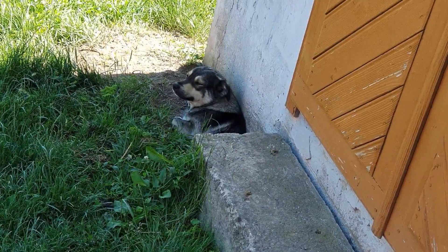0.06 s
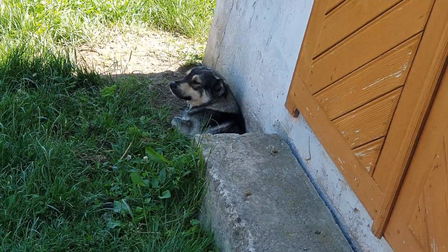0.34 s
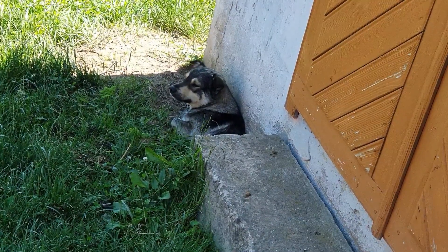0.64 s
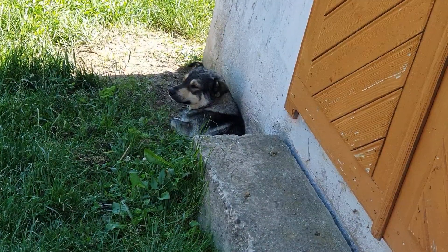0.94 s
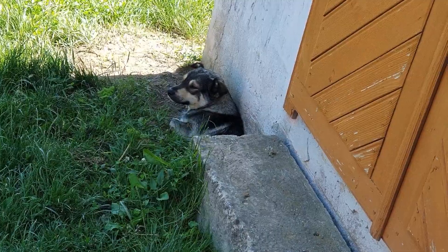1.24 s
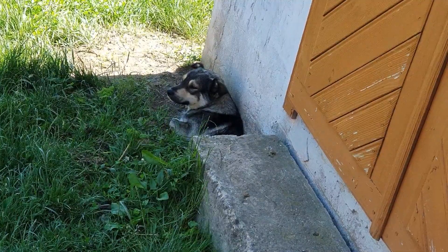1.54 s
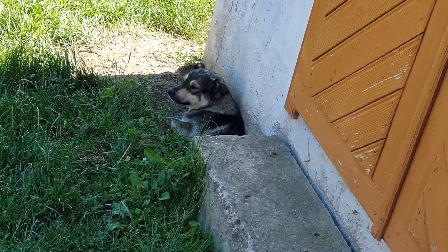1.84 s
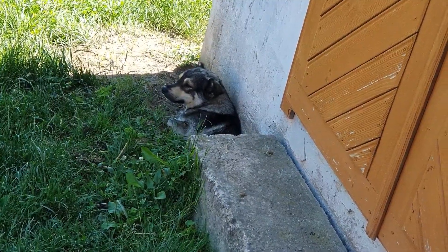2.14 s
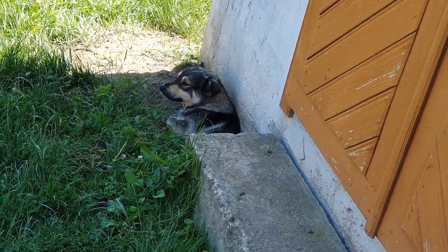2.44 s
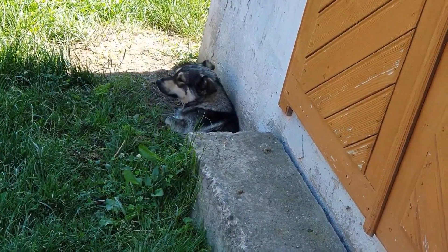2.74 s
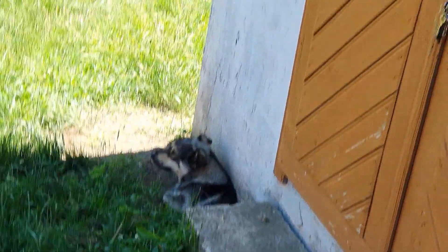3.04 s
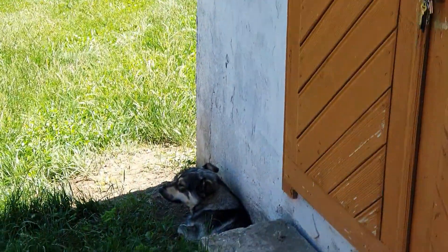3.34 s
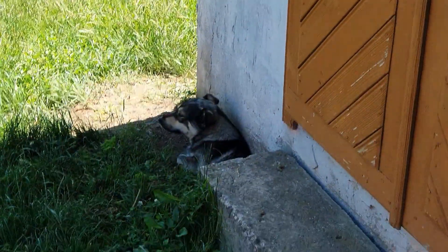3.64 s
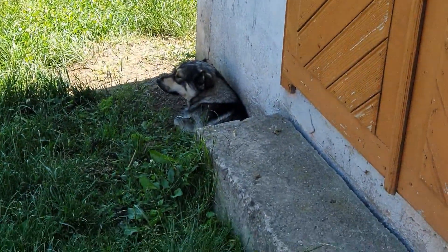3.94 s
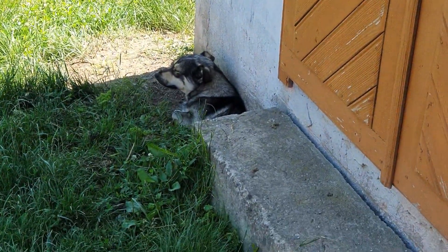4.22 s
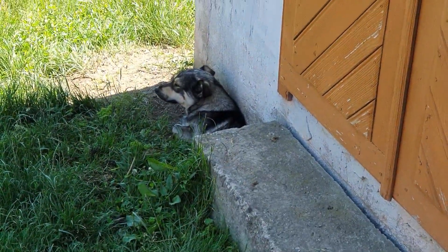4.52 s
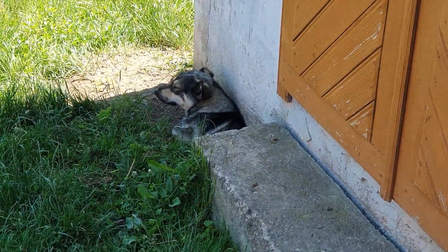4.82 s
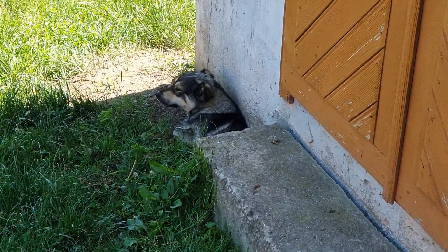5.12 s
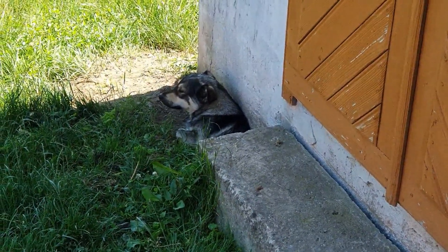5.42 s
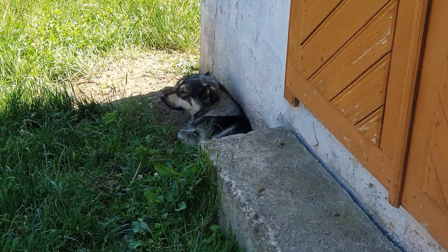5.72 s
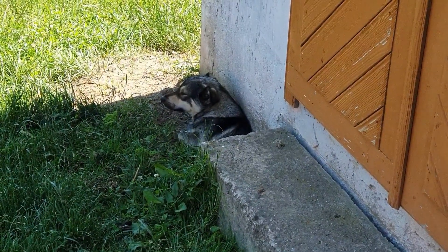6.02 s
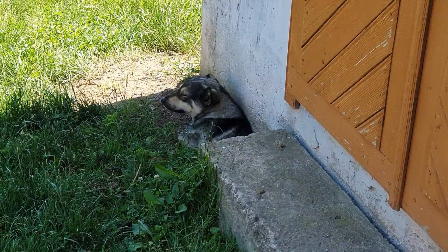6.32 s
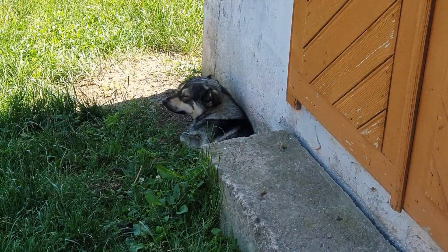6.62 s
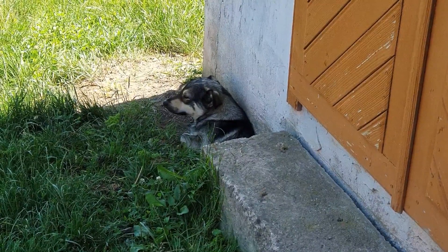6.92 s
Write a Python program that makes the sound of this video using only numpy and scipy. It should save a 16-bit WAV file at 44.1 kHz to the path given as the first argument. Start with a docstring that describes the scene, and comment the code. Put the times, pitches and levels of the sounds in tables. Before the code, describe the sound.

From the start, nearby sparrows give short, buzzy chirps in a summer farmyard, over the chatter of a distant flock and a faint outdoor hiss. Light gusts buffet the microphone with low rumbles and sudden puffs that shift between left and right. At about 1.3 seconds a songbird begins fluty, gliding whistles that ring slightly among the trees. Near 2 seconds, as the wind drops, a far rooster crows once, very faintly. From 2 to 4.6 seconds a soft, fluttering rustle sounds close by, with a few dull bumps from 3 seconds on. The songbird sings a short phrase at 3 seconds and again at 4.8, when a sparrow also begs in thin, high squeals. The wind returns around 3.4 seconds and puffs most often between 4.5 and 6.4. Chirps and whistles continue until the end, just after 7 seconds.

```python
"""A summer farmyard, beside a house wall. From the start, sparrows chirp over a far flock and still air,
each call a gliding, trilled syrinx tone, while light gusts buffet the two microphone ports.
At 1.3 s a songbird starts fluty whistles in the trees; near 2 s a far rooster crows faintly.
From 2 to 4.6 s a soft, fluttering rustle and a few dull bumps sound close by. The songbird sings its
motif at 3 s and at 4.8 s, as a sparrow begs in thin squeals. Chirps, whistles and wind carry on."""
import sys
import numpy as np
from scipy import signal
from scipy.fft import rfft, irfft, next_fast_len
from scipy.io import wavfile
from scipy.ndimage import uniform_filter1d

SR = 44100
rng = np.random.default_rng(int(sys.argv[2]) if len(sys.argv) > 2 else 0)


def wrap_up_sound(samples):
    """Save the sound to the file named by the first command line argument, as 16-bit audio."""
    columns = np.atleast_2d(samples).T
    # keep every value between -1 and 1, then stretch to whole-number steps
    tamed = np.clip(columns, -1, 1)
    steps = np.round(tamed * 32767).astype(np.int16)
    wavfile.write(sys.argv[1], SR, steps)


N = 316197
TIME = np.arange(N) / SR


def from_db(db):
    """Decibels to gain. Table levels are relative, ahead of each source's gains and filters."""
    return 10 ** (np.asarray(db) / 20)


def unit_rms(x):
    """Scale to unit power."""
    return x / np.sqrt(np.mean(x ** 2) + 1e-20)


def curves(rows):
    """Interpolate each column of a time table to every sample."""
    times, *columns = np.transpose(rows)
    return [np.interp(TIME, times, column) for column in columns]


def panned(pan_db):
    """Constant-power stereo gains; pan is left minus right."""
    gains = from_db(np.array([[.5], [-.5]]) * pan_db)
    return gains / np.sqrt(np.mean(gains ** 2, axis=0))


def add(out, start_s, sound):
    """Mix in a stereo sound."""
    at = int(np.clip(start_s * SR, 0, N - 1))
    out[:, at:at + sound.shape[1]] += sound[:, :N - at]


def coloured(x, spectrum):
    """Filter by (f/Hz, level/dB) points; cut everything outside them."""
    hz, db = np.transpose(spectrum)
    length = x.shape[1]
    size = next_fast_len(length, True)
    bins_hz = np.maximum(np.fft.rfftfreq(size, 1 / SR), 1)
    gain = from_db(np.interp(np.log(bins_hz), np.log(hz), db, left=-120, right=-120))
    return irfft(rfft(x, size) * gain, size)[:, :length]


def noise(spectrum):
    """Shaped unit noise, independent at the two ports."""
    return unit_rms(coloured(rng.standard_normal((2, N)), spectrum))


def drift(corner_hz):
    """Smooth random curve of unit RMS."""
    step, run_in = 8, 4000
    pole = np.exp(-2 * np.pi * corner_hz * step / SR)
    white = rng.standard_normal(N // step + run_in + 2)
    slow = signal.lfilter([1], [1, -2 * pole, pole * pole], white)[run_in:]
    return np.interp(np.arange(N) / step, np.arange(len(slow)), unit_rms(slow))


def thumps(rows, width, rise_s):
    """Soft swells of band noise around each row's frequency."""
    out, t = np.zeros((2, N)), np.arange(SR // 6) / SR
    swell = (t / rise_s) ** 3 * np.exp(-3 * t / rise_s)
    for at_s, peak_db, hz, pan_db in rows:
        band = signal.butter(2, [hz / (1 + width), hz * (1 + width)], "band", fs=SR, output="sos")
        white = rng.standard_normal((2, 2 * len(t)))
        thump = swell * signal.sosfilt(np.vstack([band, band]), white)[:, len(t):]
        thump /= np.abs(thump).max(axis=1, keepdims=True)
        add(out, at_s - rise_s / 2, from_db(peak_db) * thump * panned(pan_db))
    return out


def syrinx(notes, trill_hz, trill_swing, tremolo, jitter, overtone_db, edge_db, second_db, second_spread,
           fade_s=.012, flicker_db=2.5):
    """Gliding near-sines; rasp trills and shakes them and brings in the syrinx's second side."""
    out = np.zeros((2, N))
    shake, waver, flicker = drift(260), drift(50), drift(55)
    for note, weave_offset in zip(notes, rng.random(len(notes))):
        start_s, length_s, first_hz, mid_hz, last_hz, rasp, db, pan_db = note
        length_s, rasp = max(length_s, .01), np.clip(rasp, 0, 1)
        samples = np.arange(int((length_s + fade_s) * SR))
        t, span = samples / SR, (samples + int(start_s * SR)) % N
        progress = np.clip((t - fade_s / 2) / length_s, -.08, 1.08)
        parabola = np.polyfit([0, .5, 1], [first_hz, mid_hz, last_hz], 2)
        glide_hz = np.polyval(parabola, progress) * (1 + .007 * waver[span])
        trill = np.sin(2 * np.pi * trill_hz * t)
        bend = 1 + rasp * (trill_swing * trill + jitter * shake[span])
        phase = 2 * np.pi * np.cumsum(glide_hz * bend) / SR
        # second side weaves above and below the first
        weave = 1 + second_spread * np.sin(2 * np.pi * (weave_offset + progress)) - jitter * shake[span]
        second_phase = 2 * np.pi * np.cumsum(np.sqrt(glide_hz * mid_hz) * weave) / SR
        tone = np.sin(phase) + rasp * from_db(second_db) * np.sin(second_phase)
        smear = 4 * rasp * shake[span]  # turns overtones to bright hiss
        overtones = np.sin(2 * phase + smear)
        overtones += rasp * (np.sin(phase + second_phase - smear) + np.sin(3 * phase - smear))
        envelope = np.sin(np.pi / 2 * np.clip(np.minimum(t, t[-1] - t) / fade_s, 0, 1)) ** 2
        envelope *= from_db(edge_db * (2 * progress - 1) ** 2 + flicker_db * flicker[span])
        envelope *= 1 + np.clip(tremolo * rasp, 0, 1) * trill
        voice = unit_rms((tone + from_db(overtone_db) * overtones) * envelope)
        add(out, start_s - fade_s / 2, from_db(db) * voice * panned(pan_db))
    return out


def slides(rows, arch):
    """Slides to syrinx notes: rises go straight, falls bow by `arch` octaves per octave."""
    notes = []
    for start_s, length_s, hz, slide_oct, rasp, db, pan_db in rows:
        sag_oct = arch * min(slide_oct, 0)
        first_hz, last_hz = hz * 2 ** (sag_oct - slide_oct / 2), hz * 2 ** (sag_oct + slide_oct / 2)
        notes.append((start_s, length_s, first_hz, hz, last_hz, rasp, db, pan_db))
    return notes


# Echo tail; overtones beamed away by the beak arrive scattered: f/Hz, level/dB
TAIL_SPECTRUM = [(300, -5.5), (6000, 1), (8000, 7), (11500, 3), (16000, 24)]
def yard(x, wall_db, tail_db, t60_s, port_lag_s=.00044):
    """Direct sound, left port first; quick wall and ground reflections; a diffuse tail."""
    t = np.arange(SR) / SR
    envelope = from_db(-60 * t / t60_s) * (1 - np.exp(-t / .006))
    tail = unit_rms(rng.standard_normal((2, SR)) * envelope) / np.sqrt(SR)
    response = from_db(tail_db) * coloured(tail, TAIL_SPECTRUM)
    response[[0, 1], [0, round(port_lag_s * SR)]] += 1
    for side in response:
        lags = (rng.uniform(.00091, .018, size=6) * SR).astype(int)
        side[lags] += from_db(wall_db) * rng.choice([-1, 1], size=6)
    return signal.fftconvolve(x, response, axes=1)[:, :N]


# Outdoor noise floor: f/Hz, level/dB
AIR_SPECTRUM = [(25, -13), (55, -1), (120, -4), (250, -10.5), (500, -15.5), (800, -15), (1100, -21.5),
                (2000, -24.5), (5000, -14.5), (7500, -33), (10000, -32.5), (15500, -40)]
def still_air():
    """Faint, steady outdoor hiss."""
    return from_db(-67.5) * noise(AIR_SPECTRUM)


# Crow contour: t/s, f/Hz, level/dB
CROW_CURVE = [(1.5, 820, -100), (1.7, 845, -91), (1.9, 800, -99), (2.03, 781.5, -74), (2.09, 779, -78),
              (2.18, 757, -99), (2.3, 736, -100)]
def rooster():
    """A held, sinking crow; distance leaves only its two lowest partials."""
    hz, db = curves(CROW_CURVE)
    phase = 2 * np.pi * np.cumsum(hz * (1 + .014 * drift(40))) / SR
    voice = from_db(db) * unit_rms(np.sin(phase) + from_db(-14) * np.sin(2 * phase))
    return yard(voice * panned(0), wall_db=-10.5, tail_db=1, t60_s=1)


# Flock loudness: t/s, level/dB
FLOCK_CURVE = [(0.0, -55.5), (0.66, -59), (0.84, -56), (1.12, -59), (1.58, -54), (1.72, -61), (2.93, -69),
               (3.41, -60), (3.85, -58.5), (4.03, -73), (4.23, -61.5), (4.37, -61), (5.35, -60),
               (5.71, -65), (6.39, -58), (6.65, -60.5), (6.85, -69.5), (7.17, -56)]
# Merged echoes: f/Hz, level/dB
WASH_SPECTRUM = [(1800, -44), (2400, -23.5), (2700, -12), (3100, -5.5), (3600, -5), (4400, -9), (5300, -19),
                 (6100, -26.5), (7200, -28.5)]
def far_flock(count=95):
    """Far sparrows call at random; their echoes merge into a gently swelling wash."""
    level_db, = curves(FLOCK_CURVE)
    when, length, pitch, arch, fall, rasp, loudness, side = rng.random((count, 8)).T
    start_s = (np.arange(count) + when) / count * TIME[-1]
    first_hz = 3600 + 1100 * pitch
    mid_hz, last_hz = first_hz * (.85 + .25 * arch), first_hz * (.7 + .25 * fall)
    notes = np.column_stack([start_s, .018 + .033 * length, first_hz, mid_hz, last_hz,
                             .07 + .73 * rasp, 9 * (loudness - 1), 10 * (side - .5)])
    calls = syrinx(notes, trill_hz=200, trill_swing=.03, tremolo=.3, jitter=.03,
                   overtone_db=-42, edge_db=-3, second_db=-6, second_spread=.15)
    calls = unit_rms(yard(calls, wall_db=-7, tail_db=6, t60_s=.61))
    wash = from_db(2 * drift(4)) * noise(WASH_SPECTRUM)
    return from_db(level_db) * (from_db(-.5) * calls + from_db(-3.5) * wash)


# Rustle contour: t/s, level/dB, flutter depth/0-1
RUSTLE_CURVE = [(2.03, -100, 0.9), (2.1, -60, 0.46), (2.3, -64, 0), (2.6, -58, 0.29), (2.72, -71.5, 0),
                (3.08, -60.5, 0.25), (3.13, -55.5, 0.3), (3.35, -61.5, 0.07), (3.6, -77, 0.2),
                (4.15, -64, 0.31), (4.4, -100, .1)]
# Rustle noise: f/Hz, level/dB
RUSTLE_SPECTRUM = [(150, 13), (260, 2), (400, 3.5), (600, -6), (1200, -4.5), (2000, -7.5), (4000, 3),
                   (7000, -19), (9500, -22.5), (15000, -40)]
# Bumps: t/s, peak level/dB, f/Hz, pan/dB
DULL_BUMPS = [(3.114, -48, 365, 16), (3.193, -45.5, 350, 15), (4.069, -47, 313, 13),
              (4.132, -38.5, 340, 10), (4.573, -39, 262, 22)]
def rustle_and_bumps():
    """A soft, fluttering rustle and a few dull bumps, close by."""
    db, depth = curves(RUSTLE_CURVE)
    flutter_hz = 22 + 4 * drift(11.3)
    flutter = 1 + depth * np.sin(2 * np.pi * np.cumsum(flutter_hz) / SR)
    rustle = from_db(db) * flutter * noise(RUSTLE_SPECTRUM)
    return rustle + thumps(DULL_BUMPS, width=.3, rise_s=.0074)


# Gusts: t/s, level/dB, pan/dB
GUST_CURVE = [(0.0, -47.5, -14.5), (0.42, -60.5, -2.5), (0.72, -43.5, -15.5), (1.28, -42, -9.5),
              (1.5, -65.5, -9), (1.9, -83.5, 2), (2.2, -66, 5), (2.58, -52.5, 4), (2.72, -68, 18),
              (3.06, -74.5, 8), (3.28, -51.5, -2), (3.42, -33.5, -22), (3.62, -50.5, 14), (4.06, -61, 3.5),
              (4.3, -47, -5.5), (4.48, -46, 1.5), (4.7, -39, 6), (5.3, -39.5, -8), (5.6, -49.5, -2.5),
              (5.86, -61, -6), (6.14, -39.5, 24), (6.42, -66, -2), (6.66, -66.5, 21), (6.82, -44.5, -40),
              (6.95, -74.5, -3), (7.17, -81, 20)]
# Low rumble: f/Hz, level/dB
EDDY_SPECTRUM = [(15, -33), (25, -42.5), (40, -2.5), (58, 2.5), (95, -4.5), (130, -23.5), (200, -32),
                 (300, -39.5), (600, -74.5)]
# Smaller, higher eddies: f/Hz, level/dB
BUFFET_SPECTRUM = [(50, -7.5), (100, 2.5), (170, -5.5), (260, -25), (400, -20), (800, -41), (2000, -37.5)]
# Sudden puffs: t/s, peak level/dB, f/Hz, pan/dB
WIND_PUFFS = [(.235, -28, 87, -37), (.765, -36, 76.4, 21), (.94, -30, 116, -25), (1.18, -36.5, 103.7, -16),
              (3.345, -26.5, 138.5, -34), (3.4, -27.5, 132.4, -30), (3.487, -23, 102, 24),
              (3.74, -31.5, 75, 32), (4.158, -25, 107.8, -20), (4.562, -23, 107, 11),
              (4.762, -21.5, 84, 11), (4.91, -25.5, 94.2, 18), (5.425, -21, 64.6, -36),
              (5.74, -31.5, 65, 31), (5.943, -24, 62, -16), (6.07, -16, 78.2, 39), (6.165, -26, 78, 38),
              (6.325, -31.5, 63.4, -16), (6.412, -29.5, 64, -11)]
def wind(lump_db=4, lump_hz=8.8):
    """Each port has its own eddies, arriving in lumps, with sudden puffs on top."""
    db, pan_db = curves(GUST_CURVE)
    swell_db = lump_db * np.clip([drift(lump_hz), drift(lump_hz)], -2, 2)
    gust = from_db(db + swell_db) * panned(pan_db)
    eddies = noise(EDDY_SPECTRUM)
    eddies /= np.sqrt(uniform_filter1d(eddies ** 2, int(.06 * SR), axis=1) + 1e-6)  # even out the level
    buffets = noise(BUFFET_SPECTRUM) * from_db(1.92 * drift(42))
    buffets *= (gust / from_db(-28.5)) ** .04  # stronger gusts shed slightly more
    rumble = gust * (from_db(5) * eddies + from_db(-11.5) * buffets)
    return rumble + thumps(WIND_PUFFS, width=.59, rise_s=.01247)


# Low lead-in, held note, tumble, afterthought:
# t/s into motif, length/s, f/Hz, slide/oct, warble/0-1, level/dB, pan/dB
MOTIF_NOTES = [(0, 0.138, 1708, .04, 0.43, -7, -1), (.2, .15, 1949, -0.06, 0.38, 1, 4),
               (0.315, .125, 1575, -0.59, .6, -8.5, -1.5), (.6, .16, 1740, -.13, 0.43, -4, -1.5)]
# Motif entries: t/s, level/dB
MOTIF_STARTS = [(2.96, -54.5), (4.82, -60)]
# Loose whistles: t/s, length/s, f/Hz, slide/oct, warble/0-1, level/dB, pan/dB
FREE_WHISTLES = [(1.263, .09, 2604, -0.24, 0.44, -56, -3), (1.352, 0.084, 2077, -0.16, 0.32, -59.5, -4),
                 (1.374, 0.12, 1612, -0.47, .88, -70.5, 1), (1.451, .14, 2141, 0.17, 0.27, -57, -1),
                 (1.666, 0.1, 1916, -0.23, 0, -53, 3), (1.72, 0.083, 2270, 0.17, 0.45, -59, -5),
                 (1.802, 0.13, 1863, .02, 0.94, -57.5, 3), (1.955, .3, 2598, -.2, 0.4, -62.5, 2),
                 (2.102, 0.22, 2299, -0.009, 0.2, -58.5, -7.5), (2.497, 0.095, 1880, 0.13, 0.1, -73.5, -2),
                 (2.895, 0.068, 2440, -0.012, 0.73, -68.5, -1), (3.93, 0.14, 2277, -0.18, 0.36, -62, -4.5),
                 (4.74, 0.11, 2410, -.08, .85, -71.5, -8), (5.354, .08, 2560, 0.06, 0.8, -65.5, -5),
                 (5.854, 0.23, 2241, .2, 0.35, -69, 9), (5.932, 0.0723, 2368, 0.106, 0.26, -58, -6),
                 (5.988, 0.074, 2470, -0.05, 0.15, -50, -3.5), (6.123, 0.15, 2195, -0.068, 0.1, -64, 8),
                 (6.19, .07, 1907, -0.11, 0, -55, 1.5), (6.828, 0.22, 1865, -0.24, 0.73, -70.5, -2),
                 (7.054, 0.083, 2490, 0.46, 0.3, -71, -1)]
def songbird():
    """Pure low whistles, some slowly warbled, ringing on among the trees."""
    motifs = [(start_s + offset_s, length_s, hz, slide_oct, warble, db + note_db, pan_db)
              for start_s, db in MOTIF_STARTS
              for offset_s, length_s, hz, slide_oct, warble, note_db, pan_db in MOTIF_NOTES]
    notes = slides(motifs + FREE_WHISTLES, arch=.37)
    song = syrinx(notes, trill_hz=33, trill_swing=.015, tremolo=1.1, jitter=.04,
                  overtone_db=-42, edge_db=-5, second_db=-18, second_spread=.1)
    return from_db(-5.5) * yard(song, wall_db=-10.5, tail_db=-4, t60_s=.85)


# Squeals: t/s, length/s, first f/Hz, mid f/Hz, last f/Hz, rasp/0-1, level/dB, pan/dB
BEGGING_NOTES = [(4.8, 0.07, 5660, 5540, 6060, 0.13, -54.5, -6.5),
                 (4.885, 0.089, 5870, 5570, 5290, 0.23, -54.5, -4),
                 (5.035, 0.019, 4240, 5490, 5400, 0.05, -56, -3),
                 (5.065, 0.12, 5550, 5460, 5280, 0.14, -50.5, -6)]
def begging_sparrow():
    """Thin squeals, modulated so fast that they split into a ladder of sidebands."""
    squeals = syrinx(BEGGING_NOTES, trill_hz=520, trill_swing=.5, tremolo=2.5, jitter=.03,
                     overtone_db=-45, edge_db=-2, second_db=3, second_spread=.15)
    return from_db(-5.5) * yard(squeals, wall_db=-39, tail_db=-10.5, t60_s=.29)


# Chirps: t/s, length/s, peak f/Hz, rasp/0-1, level/dB, accent/dB, pan/dB
NEAR_CHIRPS = [(0.092, 0.086, 4550, 0.93, -59, 8, -1), (.293, 0.085, 4630, 0.62, -46.5, 1, -2.5),
               (0.634, 0.12, 4924, 0.75, -45.5, -9, -2), (0.869, .115, 5404, 0.72, -53, -0.5, -1),
               (1.438, 0.15, 4772, 1, -49, -3, -1), (1.996, .09, 5470, 0.26, -69, 8.5, 0),
               (2.1, 0.15, 4590, 0.44, -58, -3.5, -2.5), (2.567, 0.11, 4530, 0.5, -51, 4.5, -3),
               (2.936, 0.17, 3902, 0.64, -62.5, -5, -3), (3.188, 0.1, 4487, 0.52, -57, 2, -0.5),
               (3.347, .17, 4890, 0.8, -56, -4, -3), (3.732, 0.069, 4606, 0.32, -54, -2.5, -13),
               (3.918, 0.091, 5032, 0.83, -52.5, -9, -1), (4.438, 0.13, 4900, 0.52, -51, -2.5, -3),
               (4.799, 0.15, 4937, 0.9, -52.5, -8.5, 0), (4.958, 0.16, 4780, 0.5, -52.5, -7.5, 0),
               (5.174, 0.16, 4450, .8, -61.5, -1.5, 1), (5.447, 0.13, 4800, 0.74, -54, 0, 0),
               (5.68, .13, 5730, 0.2, -59.5, -7.5, -9), (5.881, 0.099, 4786, 0.6, -49, -5, 4),
               (6.142, 0.12, 5090, .65, -45, -11, -2), (6.27, 0.08, 5470, 0.3, -60, -28, 1),
               (6.464, .11, 4400, 0.62, -57, -8, -1), (6.806, 0.11, 4470, 0, -59.5, -6.5, 0),
               (7.129, 0.076, 4660, .5, -66.5, 5.5, -2)]
# Soft lead-in, high head, rasping fall, closing flick:
# t/chirp length, length/chirp length, first, mid, last f/peak f, rasp share, accent share, level/dB
CHIRP_PARTS = [(-.2, 0.29, 0.93, 0.94, 0.86, 0.9, 1, -7.5), (.03, 0.29, 0.79, 0.96, 0.93, 0.95, 1, 2),
               (.32, 0.41, .85, .75, 0.68, 0.754, 0.18, 3), (.76, 0.3, .66, .72, 0.5, 0.39, 0.027, -7.5)]
# One-note chips: t/s, length/s, f/Hz, slide/oct, rasp/0-1, level/dB, pan/dB
NEAR_CHIPS = [(0, 0.022, 2950, 0.98, 1, -58.5, -4), (.188, 0.035, 5290, -.25, 0.42, -51, 1),
              (.205, 0.036, 2360, 0.4, 0.27, -62.5, -6), (.368, 0.023, 3315, -0.1, .45, -45.5, -1),
              (.945, .03, 3406, -.1, 0.23, -49.5, -2), (.968, 0.035, 5250, -0.51, 0.13, -50.5, -1),
              (1.54, 0.049, 3840, 0.5, 0.45, -47.5, -1), (1.655, 0.05, 4340, 0.27, 0.8, -57.5, -4),
              (1.935, 0.033, 3800, -0.13, 0, -56, -9), (2.218, 0.036, 6880, -0.19, 0, -73, -9),
              (3.49, 0.03, 3630, -0.11, 0.53, -54.5, 18), (4.03, 0.044, 6670, -0.3, .1, -70.5, -8),
              (4.1, .06, 5250, -0.26, 0.3, -64, -5), (4.17, 0.059, 4134, -.08, 0, -61, -3),
              (4.26, 0.049, 3142, 0.17, 0.1, -62.5, 15), (4.4, 0.034, 3410, 0.28, .03, -50, 1),
              (4.525, 0.05, 3870, -0.25, 0.08, -55.5, -16), (5.345, 0.05, 6750, -0.24, 0.4, -66, -8),
              (5.57, 0.017, 3477, 0.07, 0.1, -54.5, 26), (5.78, 0.035, 5150, -0.47, 0.25, -56, -2),
              (6.168, 0.018, 5673, -0.4, 0.86, -61.5, 6), (6.38, 0.025, 3520, -0.02, 0.56, -57, 26),
              (6.56, 0.023, 5240, -0.12, 0.49, -61, 0), (6.965, 0.025, 3840, -0.11, 0.27, -48.5, -8)]
def near_sparrows():
    """Buzzy chips and chirps; each chirp is one four-part figure, stretched, transposed and accented."""
    chirps = [(start_s + length_s * offset, length_s * share, hz * first, hz * mid, hz * last,
               rasp * rasp_share, db + part_db + accent_db * accent_share, pan_db)
              for start_s, length_s, hz, rasp, db, accent_db, pan_db in NEAR_CHIRPS
              for offset, share, first, mid, last, rasp_share, accent_share, part_db in CHIRP_PARTS]
    chips = slides(NEAR_CHIPS, arch=1.6)
    calls = syrinx(chirps + chips, trill_hz=170, trill_swing=.075, tremolo=.6, jitter=.028,
                   overtone_db=-26, edge_db=-4, second_db=0, second_spread=.17, fade_s=.011)
    return from_db(-3) * yard(calls, wall_db=-11, tail_db=-5, t60_s=.6)


# Microphone response, birds only: f/Hz, level/dB
MIC_RESPONSE = [(300, 15), (4800, 1), (5700, 9), (6500, 3.5), (7400, -8.5), (9000, -1.5), (11000, -0.5),
                (12500, -18), (16000, -13)]
def scene():
    """Birds over still air, with wind on the microphone and a close rustle and bumps."""
    birds = near_sparrows() + begging_sparrow() + far_flock() + songbird() + rooster()
    return coloured(birds, MIC_RESPONSE) + wind() + rustle_and_bumps() + still_air()


def record(dry, cutoff_hz=15700):
    """Steep low-pass."""
    return signal.sosfilt(signal.ellip(10, .1, 80, cutoff_hz, fs=SR, output="sos"), dry)


dry = scene()
out = record(dry)
wrap_up_sound(out)
```